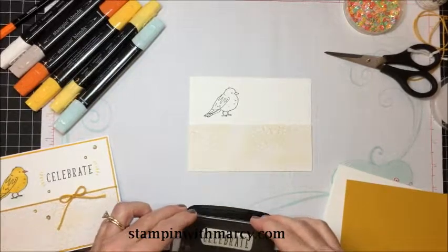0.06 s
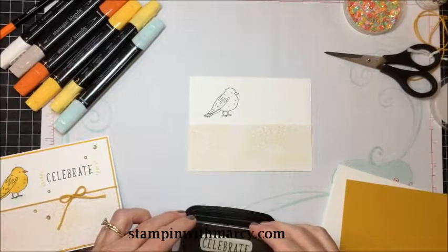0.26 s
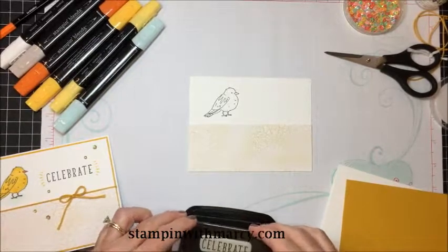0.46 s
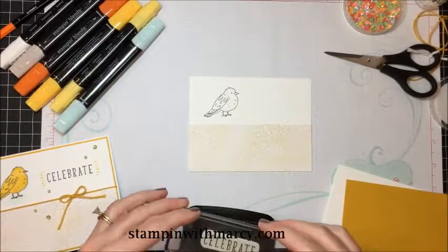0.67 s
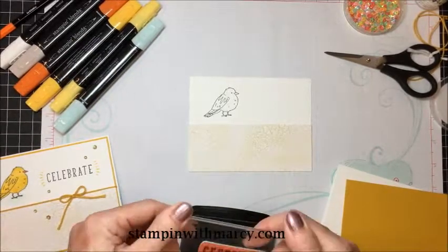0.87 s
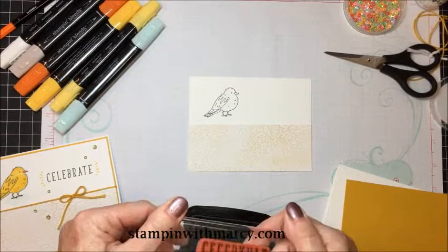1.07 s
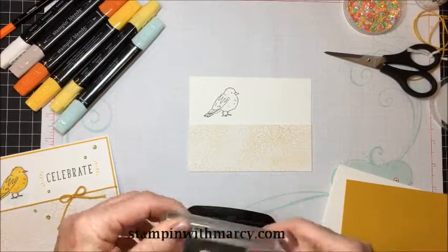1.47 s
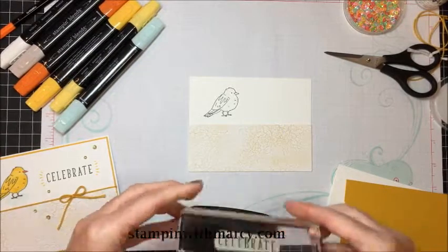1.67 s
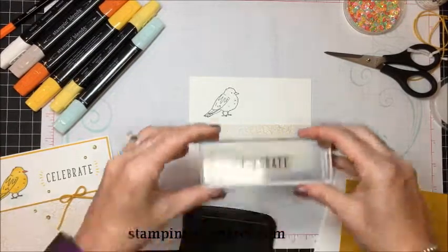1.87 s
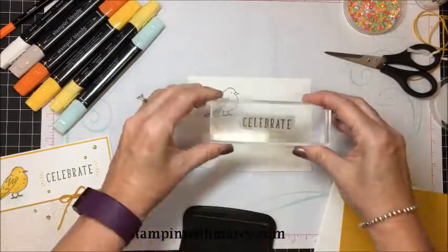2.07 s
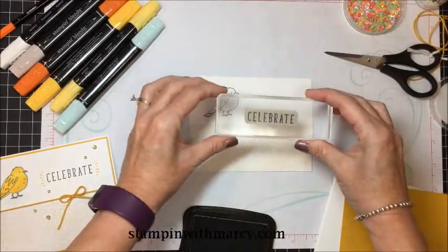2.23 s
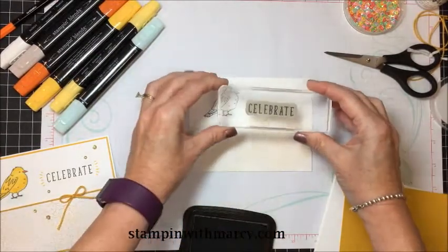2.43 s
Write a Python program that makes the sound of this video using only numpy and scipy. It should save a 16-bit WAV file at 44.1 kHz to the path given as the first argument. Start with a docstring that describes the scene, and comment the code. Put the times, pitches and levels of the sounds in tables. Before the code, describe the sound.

A clear acrylic stamp block taps three times in quick succession on an ink pad. Each tap thumps the craft table and rattles the pad's plastic case, harder and brighter than the one before. The stamp rocks softly and lifts off, then fingers tick faintly on the block. The microphone is close in a small, nearly dry room with a faint hum and hiss.

```python
"""A clear acrylic stamp block taps three times on an ink pad, on a craft table in a small room.
Each tap thumps the table top and rattles the pad's plastic case, harder and brighter than the last.
The stamp rocks on the pad, lifts off and is carried to the card with a few faint finger ticks.
One microphone, close and nearly dry; behind it all lie quiet room noise, a faint hum and hiss."""
import sys
import numpy as np
from scipy import signal
from scipy.fft import rfft, irfft
from scipy.io import wavfile

SR = 44100
rng = np.random.default_rng(int(sys.argv[2]) if len(sys.argv) > 2 else 0)


def to_wav(sig):
    """Store sig (one row per channel, or 1-D mono) as 16-bit WAV at the path in sys.argv[1].

    Samples outside -1..1 are clipped; the rate is SR.
    """
    pcm = np.clip(np.atleast_2d(sig), -1, 1) * 32767
    pcm = np.round(pcm).astype(np.int16)
    wavfile.write(sys.argv[1], SR, pcm.T)  # frames by channels


N = 110250
TIME = np.arange(N) / SR

# steady room noise and microphone hiss: (frequency [Hz], relative density [dB])
ROOM_TONE_SPECTRUM = [(20, -48), (40, 0.5), (66, 1.5), (98, -3), (135, -2), (210, -7.5), (380, -8.5),
                      (600, -15), (1400, -16.5), (2500, -16.5), (4900, -21.5), (6200, -21), (10500, -26.5),
                      (15500, -28.5)]
# swells of a faint hollow hum: (crest time [s], crest level [dB], half length [s])
SWELLS = [(0.0, -59.5, 0.11), (1.084, -74.5, 0.21), (2.243, -69.5, 0.2)]
# early reflections from near surfaces: (delay [s], gain [ratio])
REFLECTIONS = [(.011, .26), (.0239, .19)]
# the small room's reverberation: (frequency [Hz], relative density [dB], t60 [s])
REVERB_BANDS = [(70, -23, 0.47), (155, -10.5, 0.77), (307, -5.5, 0.22), (574, -5, 0.25), (1300, -2, 0.2),
                (2500, -9.5, 0.22), (6000, -1, 0.064)]
# fingers and nails on the block: (time [s], level [dB], band centre [Hz])
FINGER_TICKS = [(0.547, -70, 11000), (0.72, -69.5, 4900), (1.007, -69, 12000), (1.511, -66, 3150),
                (2.142, -68, 6800)]
# higher modes of the table top: (frequency [Hz], relative level [dB], t60 [s])
TABLE_MODES = [(164.5, -40, 0.23), (207, -36, .14), (271.9, -38.5, 0.19)]
# knock of the pad's base on the table: (frequency [Hz], relative level [dB], t60 [s])
KNOCK_MODES = [(125.4, -23, 0.067), (347.4, -38, 0.08), (456, -32, 0.045), (555, -37, 0.04)]
# the ink pad's plastic case: (frequency [Hz], relative level [dB], t60 [s])
CASE_MODES = [(794, -45.5, 0.029), (858, -40.5, 0.036), (1020, -50.5, 0.017)]
# the acrylic block: (frequency [Hz], relative level [dB], t60 [s])
BLOCK_MODES = [(1337, -45, 0.026), (1522, -41, 0.029), (1685, -47.5, 0.027), (1822, -40.5, 0.049),
               (2050, -47.5, 0.029), (2260, -47.5, 0.033), (2480, -47, 0.029), (2930, -51, 0.033),
               (3430, -58, 0.018), (3840, -60, 0.014)]
# crunch of rubber on felt and of the case on the table: (frequency [Hz], relative density [dB])
CRUNCH_SPECTRUM = [(250, 7), (560, 1.5), (680, 5.5), (1000, 4.5), (1190, -15), (1500, -3), (1850, -1.5),
                   (2100, -5), (2500, -10.5), (3600, -13), (4500, -24), (8000, -19.5)]
# the stamp rocks on the pad and lifts off: (time [s], relative level [dB], drag length [s])
ROCKING_BUMPS = [(0.0, -21, 0.013), (0.213, -39.5, 0.022), (0.418, -46, 0.0059), (0.465, -29.5, 0.012),
                 (0.585, -32, 0.02)]
# taps on the pad: (time [s], thump gain [dB], table mode gain within the thump [dB],
# case gain [dB], block gain [dB], contact cut-off [Hz])
STAMP_TAPS = [(0.1133, 0.06, -12, -2, -4.5, 1300), (0.3128, 0.5, -1, 1.5, -2.5, 2350),
              (0.4883, 1.5, -1, 2.5, 1.5, 3420)]


def from_db(db):
    """Decibels to gain."""
    return 10 ** (np.asarray(db) / 20)


def unit_rms(x):
    """Scale to an rms of 1."""
    return x / np.sqrt(np.mean(x ** 2) + 1e-20)


def at_hz(points, hz, column=1):
    """Read a column of a table on a log-frequency axis."""
    points = np.array(points, float)
    return np.interp(np.log(np.maximum(hz, 1)), np.log(points[:, 0]), points[:, column])


def filtered(x, hz, kind="low", order=2):
    """Causal Butterworth filter."""
    sections = signal.butter(order, np.clip(hz, 10, .45 * SR), kind, fs=SR, output="sos")
    return signal.sosfilt(sections, x + 1e-18)


def noise(spectrum):
    """Noise of the given colour, rms 1."""
    hz = np.arange(N // 2 + 1) * SR / N
    return unit_rms(irfft(rfft(rng.standard_normal(N)) * from_db(at_hz(spectrum, hz)), N))


def delayed(x, s):
    """The same sound s seconds later."""
    return np.interp(TIME - s, TIME, x, left=0)


def decay(t60):
    """An envelope that falls 60 dB in t60 seconds."""
    return np.exp(-np.minimum(np.log(1000) * TIME / t60, 20))


def burst(rise_s, hold_s, t60):
    """Envelope of a contact that builds, holds while the pad is squeezed, and dies."""
    return (1 - np.exp(-TIME / rise_s)) * np.interp(TIME - hold_s, TIME, decay(t60))


def ring(modes, scatter_db):
    """A struck body: neighbouring modes swing in opposite senses, weighted anew by each blow."""
    out = np.zeros(N)
    for k, (hz, db, t60) in enumerate(modes):
        gain = from_db(db + scatter_db * rng.standard_normal())
        out += (-1) ** k * gain * np.sin(2 * np.pi * hz * TIME) * decay(t60)
    return out


def room_tone():
    """The still room and the microphone's own hiss."""
    return from_db(-69) * noise(ROOM_TONE_SPECTRUM)


def hum():
    """A narrow, noisy hum far in the background; each swell rises and fades along a bell shape."""
    edge_drop_db = 8   # half a length from the crest
    hollow = filtered(rng.standard_normal(N), [345, 390], "band", order=1)
    level = sum(from_db(db - edge_drop_db * ((TIME - s) / half_s) ** 2) for s, db, half_s in SWELLS)
    return level * unit_rms(filtered(hollow, 650))


def small_room(direct, wet_db, onset_s):
    """The microphone hears the direct sound, two dull reflections and a tail that dies band by band."""
    dull = filtered(direct, hz=780, order=1)
    echoes = sum(gain * delayed(dull, s) for s, gain in REFLECTIONS)
    tail = np.zeros(N)
    for hz in np.geomspace(62.5, 8000, 8):   # octave bands
        band = filtered(rng.standard_normal(N), [hz / np.sqrt(2), hz * np.sqrt(2)], "band")
        tail += from_db(at_hz(REVERB_BANDS, hz)) * band * decay(at_hz(REVERB_BANDS, hz, column=2))
    reverb = signal.fftconvolve(direct, delayed(tail, onset_s))[:N]
    return direct + echoes + from_db(wet_db) * reverb


def finger_ticks():
    """Tiny dry contacts of fingertips on acrylic."""
    out = np.zeros(N)
    for s, db, hz in FINGER_TICKS:
        snap = unit_rms(filtered(rng.standard_normal(N), [hz / 1.5, hz * 1.35], "band", order=1))
        out += from_db(db) * delayed(snap * decay(t60=.035), s)
    return out


def table_top(modes_db, lift_s):
    """The top dips and sways, its pitch sagging as the hands load it, until the lifting stamp stills it."""
    start_hz, sag_per_s = 80.5, 1.9
    hz = start_hz * (1 - sag_per_s * np.minimum(TIME, lift_s))
    swing = from_db(-29) * np.sin(2 * np.pi * np.cumsum(hz) / SR) * decay(t60=.3)
    higher = sum(ring([mode], scatter_db=1.0) for mode in TABLE_MODES)   # all start in step with the swing
    stilled = np.interp(TIME - lift_s, [0, .022], [1, .03])
    return -(swing + from_db(modes_db) * higher) * stilled


def rocking_bumps():
    """The tacky stamp rocks on the pad: a soft push and an uneven drag that shake the table."""
    force = np.zeros(N)
    for s, db, length_s in ROCKING_BUMPS:
        drag = rng.standard_normal(N) * burst(rise_s=0.00083, hold_s=length_s, t60=0.11)
        force += from_db(db + 1.0) * delayed(drag / np.linalg.norm(drag), s)
        force[round(s * SR)] += from_db(db + 2.5)   # the push
    thump = table_top(modes_db=1.0, lift_s=0.091) + ring(KNOCK_MODES, scatter_db=5.0)
    rattle = from_db(-7.5) * ring(CASE_MODES + BLOCK_MODES, scatter_db=8.0)
    return signal.fftconvolve(force, thump + rattle)[:N]


def stamp_taps():
    """The felt passes the blow to the table; a harder contact lets more of the block's clack through."""
    out = np.zeros(N)
    for s, thump_db, modes_db, case_db, block_db, contact_hz in STAMP_TAPS:
        thump = from_db(thump_db) * (table_top(modes_db, lift_s=.076) + ring(KNOCK_MODES, scatter_db=.5))
        case = from_db(case_db) * ring(CASE_MODES, scatter_db=3.0)
        crunch = from_db(-40.5) * noise(CRUNCH_SPECTRUM) * burst(rise_s=0.0024, hold_s=0.011, t60=0.034)
        clack = from_db(block_db) * filtered(ring(BLOCK_MODES, scatter_db=1.0) + crunch, contact_hz)
        out += delayed(thump + case + clack, s)
    return out


def scene():
    """Taps and handling close to the microphone, over the hum and room tone, in mono."""
    handling = stamp_taps() + rocking_bumps() + finger_ticks()
    at_microphone = small_room(handling, wet_db=-36.5, onset_s=.016)
    return (at_microphone + hum() + room_tone())[None]


def record(dry):
    """The recorder drops the deepest rumble and cuts the top steeply."""
    low_cut_hz, top_cut_hz = 36, 15700
    top_cut = signal.ellip(12, .1, 70, top_cut_hz, fs=SR, output="sos")
    return signal.sosfilt(top_cut, filtered(dry, low_cut_hz, "high"))


dry = scene()
out = record(dry)
to_wav(out)
```